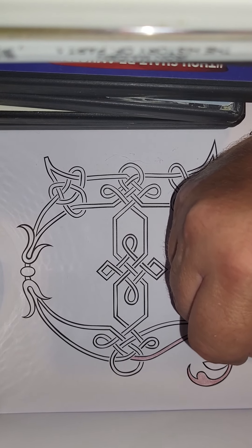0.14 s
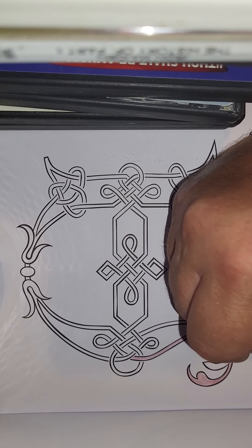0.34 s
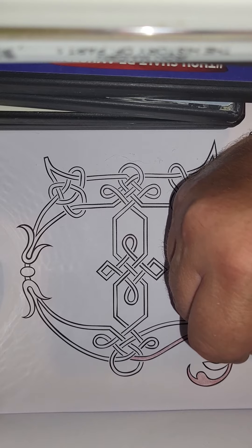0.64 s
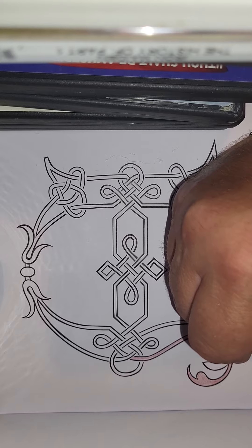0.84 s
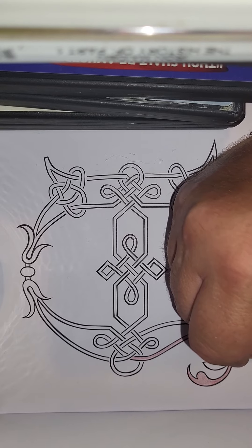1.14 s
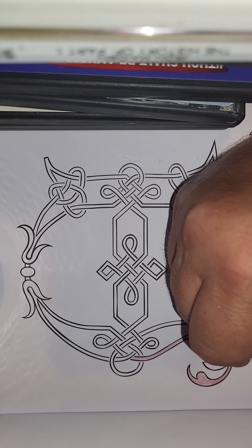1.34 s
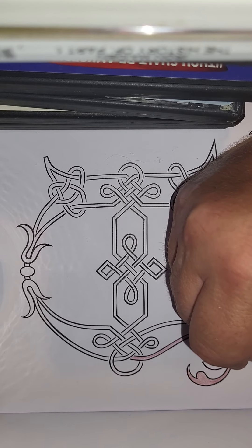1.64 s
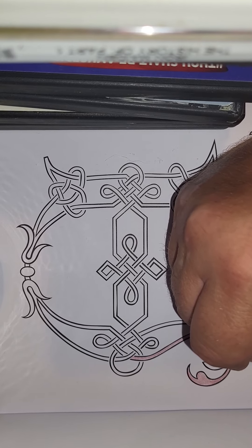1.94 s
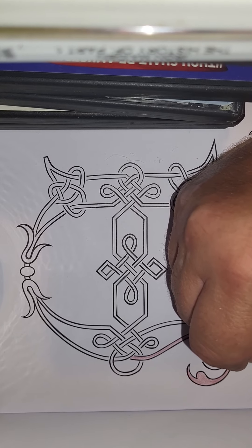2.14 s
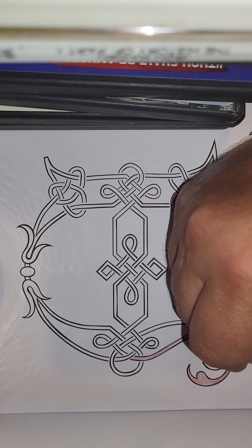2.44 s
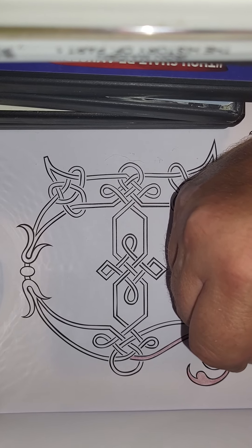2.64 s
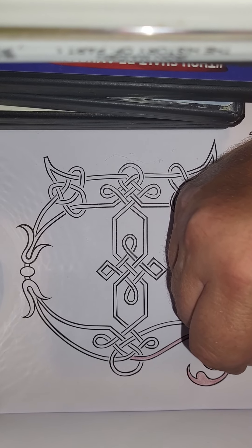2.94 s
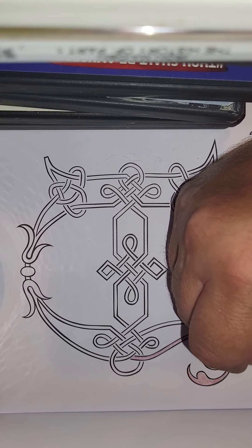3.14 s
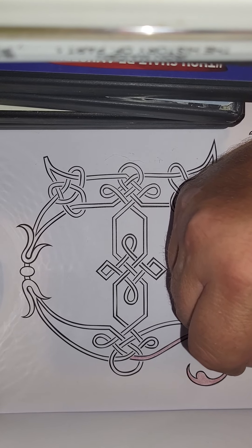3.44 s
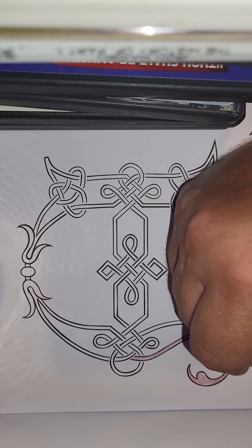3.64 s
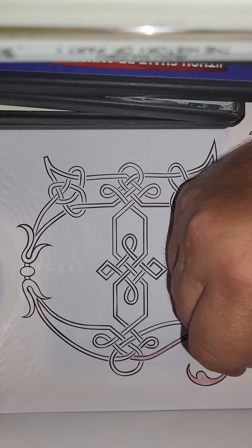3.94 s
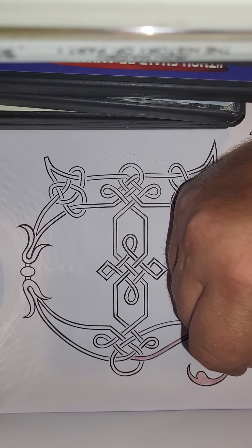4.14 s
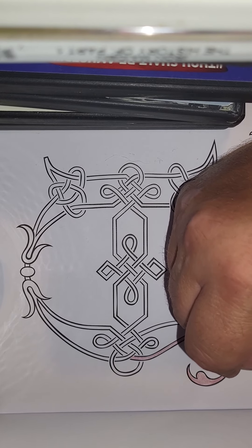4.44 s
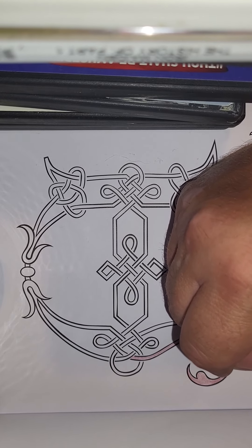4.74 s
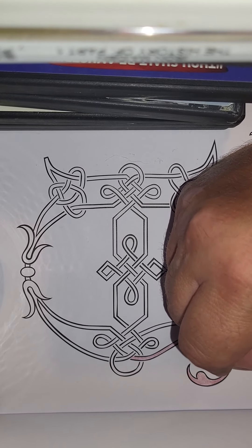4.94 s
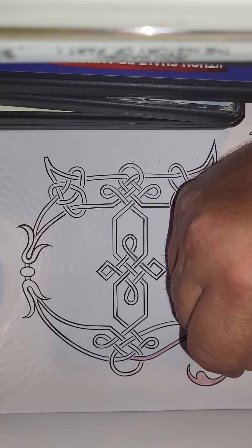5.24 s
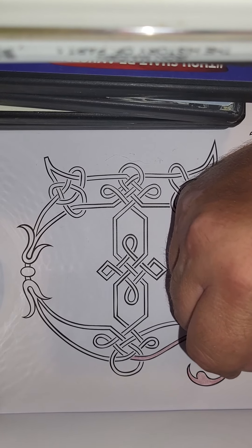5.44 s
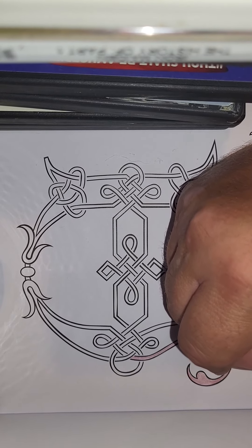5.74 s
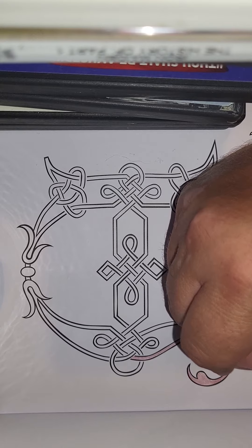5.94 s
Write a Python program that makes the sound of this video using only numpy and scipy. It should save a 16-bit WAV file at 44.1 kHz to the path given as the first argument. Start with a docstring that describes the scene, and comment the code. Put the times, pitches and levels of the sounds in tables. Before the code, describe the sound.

A quiet indoor scene with an aquarium across a small room. From 0 s the water makes a soft continuous fizz, a little stronger at first and then settling, made of fine hiss and swarms of tiny bubbles. Under it lie faint room air and a low electric pump hum that slowly beats and swells. At about 0.5 s one sharp, dry snap cracks out, by far the loudest event, gone in milliseconds with a short room reflection. Bright, irregular bubble pops continue all along, some high and ticking, others rounder and lower, notably around 4.4 to 5 s. A soft low bump comes near 0.9 s, then more at about 3.8, 4.1, 4.8 and 5.1 s, dull, close and centred, like a hand moving on a table. The water favours the left; the right is weaker and duller. It continues unchanged to the end, about 6.1 s.

```python
"""An aquarium across a small room. From the start its water fizzes, over a faint hush of room air and a
pump that hums on the mains and beats against its slower rotor. Bubbles, short damped sines, pop all along.
After half a second comes one sharp snap of very short modes; later come a few soft low bumps. The water
reaches the left microphone first; the right one faces away and hears duller treble."""
import sys
import numpy as np
from scipy import signal
from scipy.fft import rfft, irfft, next_fast_len
from scipy.io import wavfile
from scipy.ndimage import map_coordinates

SR = 44100
rng = np.random.default_rng(int(sys.argv[2]) if len(sys.argv) > 2 else 0)


def inscribe(sig):
    """Save sig as 16-bit PCM at rate SR to the path in sys.argv[1].

    A 1-D sig is mono; a 2-D sig holds one channel per row.
    Samples are clipped to [-1, 1] before scaling.
    """
    pcm = np.round(np.clip(np.atleast_2d(sig).T, -1, 1) * 32767)
    wavfile.write(sys.argv[1], SR, pcm.astype(np.int16))


def magnitude_from_level(level_db):
    """Linear magnitude for a level in decibels (20 dB per decade)."""
    exponent = np.asarray(level_db, float) / 20
    return 10 ** exponent


N = 268569  # length in samples
LEAD = 17  # samples by which the left microphone is nearer the water


def unit(x):
    """Scaled to rms 1."""
    return x / np.sqrt(np.mean(x ** 2) + 1e-20)


def along(points, hz):
    """Reads a table of (f/Hz, value) at any frequency, on a log axis."""
    f, value = np.transpose(points)
    return np.interp(np.log(hz + 1), np.log(f + 1), value)


def curve(rows):
    """Reads a table of (t/s, value) at every sample."""
    return np.interp(np.arange(N) / SR, *np.transpose(rows))


def wobble(rate):
    """A smooth random curve with rate knots a second."""
    knots = rng.standard_normal(int(N * rate / SR) + 4)
    return map_coordinates(knots, [np.arange(N) * rate / SR])


def filtered(x, response):
    """Multiplies the spectrum of x by a response of frequency."""
    m = next_fast_len(N + 8192)
    return irfft(rfft(x, m) * response(np.fft.rfftfreq(m, 1 / SR)), m)[..., :N]


def bubbles(s, db, hz, cycles, rise, size):
    """Damped sines of energy set by db, the pitch climbing as each bubble nears the surface."""
    t = np.arange(size) / SR
    age = t * (hz / cycles)[:, None]  # 1 = one life
    turns = cycles[:, None] * (age + rise * np.minimum(age, 2) ** 2 / 2)  # climbs for two lives
    soft_start = 1 - np.exp(-9 * age)
    grain = np.sin(2 * np.pi * turns) * np.exp(-np.pi * age) * soft_start
    grain *= (magnitude_from_level(db) / np.linalg.norm(grain, axis=1))[:, None]
    at = (s * SR).astype(int)[:, None] + np.arange(size)
    return np.bincount(at.ravel(), grain.ravel(), N + size)[:N]


# fizz of the calm water, drifting slowly: (t/s, level/dB before splashes and wobble)
CALM_FIZZ = [(0, -49.5), (.3, -51.5), (.7, -53.5), (1.6, -52.5), (2.3, -53.5), (3.2, -54), (4.2, -53.5),
             (5.0, -52.5), (5.7, -53), (6.09, -52.5)]


def fizz_db():
    """Every clear bubble stirs up tiny ones, which thin out again until the next."""
    settle_s = 0.16  # how fast a splash settles
    stir_db = -44  # bubble level that stirs the water most of the way
    stirred_db = 3  # the most that fresh splashes add
    s, db = np.transpose(CLEAR_BUBBLES)[:2]
    kicks = np.bincount((s * SR).astype(int), magnitude_from_level(db - stir_db), N)
    stir = signal.lfilter([1], [1, -np.exp(-1 / (settle_s * SR))], kicks)
    return curve(CALM_FIZZ) + stirred_db * np.tanh(stir) + 0.76 * wobble(5.5)


# relative colour of the swarm and the spray: (f/Hz, level/dB per Hz)
WATER_COLOUR = [(530, -13), (900, -5.5), (1260, -4.5), (1400, 0), (1660, -4.5), (2290, -5.5), (2680, -11),
                (4080, -8.5), (5060, -10.5), (7880, -10), (10500, -16), (13500, -10.5), (15800, -12.5)]


def water_colour(x):
    """Filters x to the colour of the far water, at rms 1."""
    return unit(filtered(x, lambda hz: magnitude_from_level(along(WATER_COLOUR, hz))))


def swarm(count=2200):
    """Many small bubbles of scattered size and strength."""
    draw = rng.random((count, 4))
    s = draw[:, 0] * N / SR
    hz = 700 * (15000 / 700) ** draw[:, 1]
    db = np.minimum(-3.5 * np.log(1 - draw[:, 2]), 7.5)
    grains = bubbles(s, db, hz, 3.3 + 14 * draw[:, 3], rise=0.051, size=640)
    even = filtered(grains, lambda hz: np.sqrt(hz / 4000))  # even power per hertz
    return water_colour(even)


def spray(direct_share):
    """Fine hiss of the falling water: part straight from the tank, the rest from all walls."""
    straight, walls = rng.standard_normal(N), rng.standard_normal((2, N))
    share = np.clip(direct_share, 0, 1)
    from_tank = np.array([straight, np.roll(straight, LEAD)])
    both = np.sqrt(share) * from_tank + np.sqrt(1 - share) * walls
    return magnitude_from_level(1.4 * wobble(14)) * water_colour(both)


# how long the echoes last: (f/Hz, time to fall 60 dB t/s, before the burst shapes them)
ECHO_TIME = [(300, 0.11), (2000, 0.35), (6000, 0.27), (14000, 0.1)]
# echoes of the two nearest walls: delays after the direct sound, t/s
WALL_DELAYS = (.006, .0086)


def room(wall_db, gap_s, burst_db, burst_s):
    """Direct sound, a quiet gap, two near walls, then a short burst of echoes over a tail that dies by pitch."""
    direct_db = 18.5
    hz, t, z = signal.stft(rng.standard_normal((2, SR // 2)), SR, nperseg=256)
    fade = magnitude_from_level(-60 * t / along(ECHO_TIME, hz)[:, None])
    tail = signal.istft(z * fade, SR, nperseg=256)[1]
    t = np.arange(tail.shape[1]) / SR
    tail *= magnitude_from_level(burst_db * (np.exp(-(t / burst_s) ** 2) - 0.5))
    tail[:, :round(gap_s * SR)] *= magnitude_from_level(-9)  # only the tank's own rim answers this early
    walls = np.round(np.multiply(WALL_DELAYS, SR)).astype(int)
    tail[:, [0, *walls]] = magnitude_from_level([direct_db, wall_db, wall_db])
    return np.array([np.pad(tail[0], (0, LEAD)), np.pad(tail[1], (LEAD, 0))])


# what the right microphone loses by facing away: (f/Hz, loss level/dB)
RIGHT_LOSS = [(500, 2.5), (1500, 2.5), (4400, 3), (8100, 4.5), (10500, 12), (15000, 13)]


def facing_away(heard):
    """Weakens the water at the right microphone, most of all in the treble."""
    return filtered(heard, lambda hz: magnitude_from_level(-along(RIGHT_LOSS, hz) * [[0], [1]]))


# relative colour of the room air: (f/Hz, level/dB)
AIR_COLOUR = [(20, -10), (40, -12), (80, -7.5), (130, -6), (200, -4.5), (300, -2.5), (400, -14.5),
              (690, -7.5), (1000, -16), (1430, -17.5), (2500, -18.5), (15000, -35)]
# left-right likeness of the room air: (f/Hz, likeness from -1 to 1)
AIR_LIKENESS = [(60, 0.68), (180, 1), (550, 0.069), (1650, -0.16), (4970, 0.37), (15000, -0.68)]


def air():
    """Rumble and hush of the room, most alike at both microphones in the bass."""
    def mid_side(hz):
        turn = np.arccos(np.clip(along(AIR_LIKENESS, hz), -1, 1)) / 2
        return magnitude_from_level(along(AIR_COLOUR, hz)) * [np.cos(turn), np.sin(turn)]

    mid, side = filtered(rng.standard_normal((2, N)), mid_side)
    return magnitude_from_level(-52.0 + 1.1 * wobble(3.32)) * unit(np.array([mid + side, mid - side]))


ROTOR_HZ = 58.46
# pump hum: (multiple of the mains, left level/dB, right level/dB, left leads by radians);
# rms levels, before they drift
HUM = [(1, -63.3, -63.6, 0.0), (2, -57.9, -55.6, 0.3), (3, -71.6, -72.7, 0.0), (4, -63.3, -62.7, -0.1),
       (5, -55.3, -56.4, -0.3), (6, -71.8, -79.1, -0.9), (8, -69.5, -68.2, 1.2), (10, -82.1, -67.7, 2.5),
       (12, -65.8, -63.5, 0.6), (15, -68.4, -73.0, 2.5), (16, -71.6, -82.1, -1.6), (17, -78.7, -69.9, -1.8),
       (18, -69.3, -80.7, -2.2), (19, -68.2, -85.9, -1.9), (24, -70.6, -63.9, 2.3),
       (26, -70.4, -70.4, -1.9), (27, -69.1, -72.1, -3.1), (28, -69.7, -74.1, -2.7)]
# rotor orders and other steady tones: (f/Hz, rms level/dB)
STEADY_TONES = [(ROTOR_HZ, -62), (116.92, -76), (292.3, -72), (200.25, -68), (212.36, -70)]
# the fifth multiple swells and sinks: (t/s, change level/dB, before a random wobble)
FIFTH_SWELL = [(0, 1.5), (1.1, -1), (1.7, -4.5), (2.1, 1.5), (2.7, 2.5), (3.6, -1), (4, -4), (4.6, 2.5),
               (5.3, 1.5), (5.9, 3.5), (6.09, -6)]


def pump():
    """Multiples of the mains that drift gently; the rotor slips behind and beats with the lowest."""
    mains_hz = 59.985
    beat_top_s = .221  # mains and rotor are in step here
    t, out = np.arange(N) / SR - beat_top_s, np.zeros((2, N))
    for k, left_db, right_db, lead in HUM:
        start = (k > 1) * rng.random()  # in turns
        angle = 2 * np.pi * (k * mains_hz * t + start)
        drift_db = curve(FIFTH_SWELL) + 1.5 * wobble(14) if k == 5 else .6 * wobble(2.5)
        level = np.sqrt(2) * magnitude_from_level(drift_db + [[left_db], [right_db]])
        out += level * np.cos(angle - [[0], [lead]])
    for hz, db in STEADY_TONES:
        out += np.sqrt(2) * magnitude_from_level(db) * np.cos(2 * np.pi * hz * t)
    return out


def faint_pops(count=40):
    """Rows like those of the clear bubbles, drawn by chance; small high ones are the most common."""
    weakest_db, range_db = -54, 2
    draw = rng.random((count, 4))
    s = draw[:, 0] * N / SR
    db = weakest_db + range_db * draw[:, 1]
    hz = 2600 * (15000 / 2600) ** np.sqrt(draw[:, 2])
    return np.array([s, db, hz, 2.6 + 15 * draw[:, 3]])


# the clear bubbles: (t/s, energy level/dB before the room adds its gain, f/Hz before the climb,
# life in cycles, played as at least 1)
CLEAR_BUBBLES = [(0.051, -52, 3700, 8.1), (0.117, -55.5, 13400, 2.2), (0.356, -45, 13500, 10.4),
                 (0.404, -50.5, 2110, 7.0), (0.68, -44.5, 7180, 5.6), (0.695, -50, 6800, 2.8),
                 (0.762, -49.5, 4740, 4.6), (0.917, -49, 5200, 3.9), (0.924, -46, 523, 6.7),
                 (1.083, -50, 12570, 3.4), (1.082, -43, 7200, 6.2), (1.091, -48.5, 1090, 15),
                 (1.211, -44.5, 4540, 13), (1.4, -50, 3370, 0.96), (1.768, -51.5, 8300, 5.3),
                 (1.86, -49, 8000, 5.8), (1.948, -50.5, 8300, 5.4), (1.992, -41.5, 6660, 6.5),
                 (1.997, -48, 13350, 5.8), (2.085, -48, 4270, 5), (2.121, -48, 5620, 6),
                 (2.131, -52, 2270, 16), (2.142, -51, 9120, 2.6), (2.192, -51, 4140, 2.8),
                 (2.442, -45.5, 8000, 3.9), (2.572, -53.5, 5600, 20.5), (2.7, -51, 6340, 9.7),
                 (2.728, -47, 1600, 9.4), (2.766, -54, 2750, 14), (2.814, -50, 7440, 3.6),
                 (2.891, -42.5, 13800, 8.6), (2.894, -55, 5080, 19), (3.058, -52, 6000, 12),
                 (3.11, -46, 3300, 30), (3.24, -44, 10100, 5.3), (3.385, -47, 14670, 6.9),
                 (3.389, -42, 4460, 14), (3.469, -52, 2070, 9.6), (3.582, -50, 7570, 6.9),
                 (3.709, -52, 3670, 2.6), (3.739, -51, 10000, 2.7), (3.845, -58, 1006, 27),
                 (3.915, -54, 14100, 10.5), (4.019, -49.5, 5200, 13), (4.176, -47.5, 4270, 7.6),
                 (4.272, -52.5, 7770, 5.7), (4.391, -44.5, 1340, 26), (4.433, -49.5, 5200, 5.9),
                 (4.55, -46.5, 1520, 5.2), (4.661, -44.5, 1340, 24), (4.707, -47.5, 9700, 5.6),
                 (4.832, -44.5, 13100, 15), (4.867, -45, 11600, 4.5), (4.896, -49.5, 5070, 3.3),
                 (4.971, -48.5, 1095, 16), (5.099, -52, 523, 4.3), (5.104, -50, 5520, 1.4),
                 (5.181, -51, 5230, 7), (5.308, -49, 6660, 8.9), (5.358, -46.5, 5030, 13),
                 (5.382, -46, 13880, 19), (5.557, -49.5, 6220, 7.7), (5.615, -47.5, 3070, 8.4),
                 (5.678, -50, 6000, 5), (5.805, -49.5, 1380, 14), (5.81, -51.5, 3980, 5.3),
                 (5.954, -49, 4580, 18), (5.978, -47, 14620, 3.8), (6.023, -48, 14470, 5.8)]


def pops():
    """Each bubble, clear or faint, rings, and its film bursts with a faint broad tick."""
    s, db, hz, cycles = np.hstack([np.transpose(CLEAR_BUBBLES), faint_pops()])
    tick_hz = np.clip(hz, 3000, 9000)
    tick = bubbles(s, db - 5.5, tick_hz, np.full_like(s, 1.3), rise=0, size=64)
    ring = bubbles(s, db, hz, np.maximum(cycles, 1), rise=0.011, size=1024)
    return ring + tick


# the snap: (t/s, energy level/dB before the room adds its gain)
SNAP = (.5167, -26)
# what the snap rings with: (f/Hz, relative level/dB, time to fall 60 dB t/s, shortened below if too long)
SNAP_MODES = [(610, -1, 0.0033), (1340, 3.5, 0.027), (1850, 13.5, 0.0038), (2380, -8, 0.0028),
              (3650, 5, 0.0018), (5200, 5.5, 0.0026), (6650, -15, 0.0022), (7750, -10, 0.0036),
              (13300, -6, 0.0033)]


def snap():
    """One dry crack: a few modes that all start at full swing and are gone within milliseconds."""
    longest_ring_s = .018
    t, ring, out = np.arange(2048) / SR, np.zeros(2048), np.zeros(N + 2048)
    for hz, db, t60 in SNAP_MODES:
        ring += magnitude_from_level(db - 60 * t / min(t60, longest_ring_s)) * np.cos(2 * np.pi * hz * t)
    s, snap_db = SNAP
    out[round(s * SR):][:2048] = magnitude_from_level(snap_db) * ring / np.linalg.norm(ring)
    return out[:N]


# low bumps: (t/s, starting level/dB of the thud before its fade, f/Hz)
LOW_BUMPS = [(0.929, -46, 305), (3.758, -45, 250), (3.841, -41.5, 234), (4.124, -44, 128),
             (4.789, -41.5, 172), (5.087, -41.5, 242)]


def bumps():
    """Soft bumps close by, perhaps a hand shifting on the table: a thud and a dull puff, alike left and right."""
    t, out = np.arange(SR // 8) / SR, np.zeros(N + SR)
    noise = rng.standard_normal(N)
    dull = unit(filtered(noise, lambda hz: (hz > 90) / (1 + (hz / 520) ** 4)))
    onset = np.minimum(t / 0.0022, 1)
    for s, db, hz in LOW_BUMPS:
        at = round(s * SR)
        body = np.sin(2 * np.pi * hz * t) + magnitude_from_level(-5) * dull[at:at + len(t)]
        out[at:][:len(t)] += magnitude_from_level(db - 60 * t / 0.079) * onset * body
    return out[:N]


def scene():
    """Water and snap pass through one room; pump, air and bumps surround the microphones."""
    echoes = room(wall_db=12.5, gap_s=0.005, burst_db=4.5, burst_s=0.034)
    flow = magnitude_from_level(fizz_db())
    small = magnitude_from_level(-2.0) * flow * swarm() / np.linalg.norm(echoes[0])
    source = small + pops() + snap()
    heard = signal.fftconvolve(source[None], echoes, axes=1)[:, :N]
    heard = heard + magnitude_from_level(-1.5) * flow * spray(direct_share=0.44)
    return facing_away(heard) + air() + pump() + bumps()


def roll_off(x):
    """The treble ends steeply here."""
    return signal.sosfilt(signal.butter(12, 15950, fs=SR, output="sos"), x)


def record(dry):
    """Takes the finished mix as both microphones hear it."""
    return roll_off(dry)


dry = scene()
out = record(dry)
inscribe(out)
```